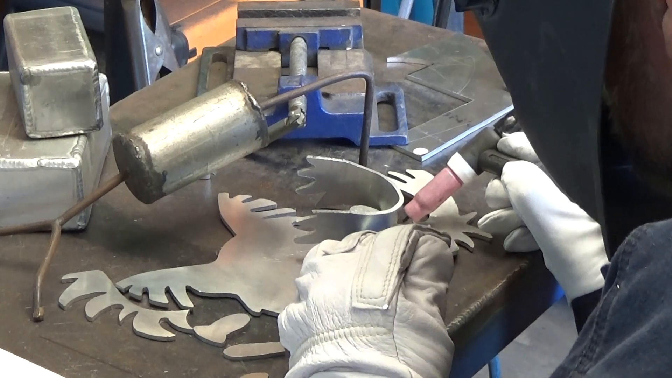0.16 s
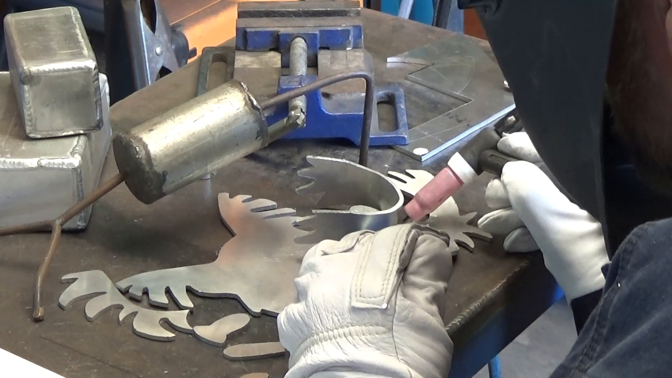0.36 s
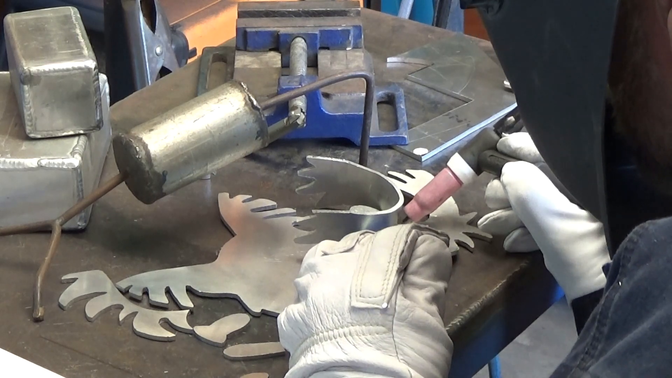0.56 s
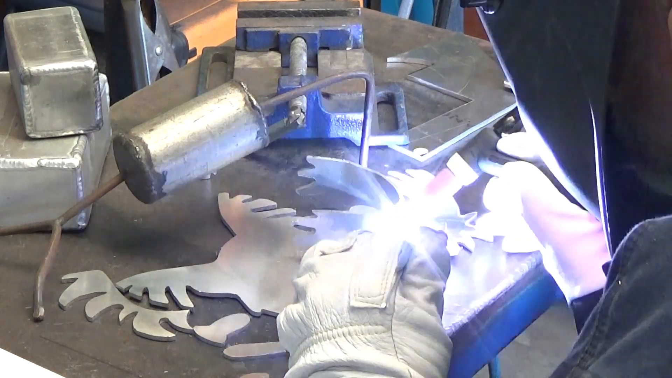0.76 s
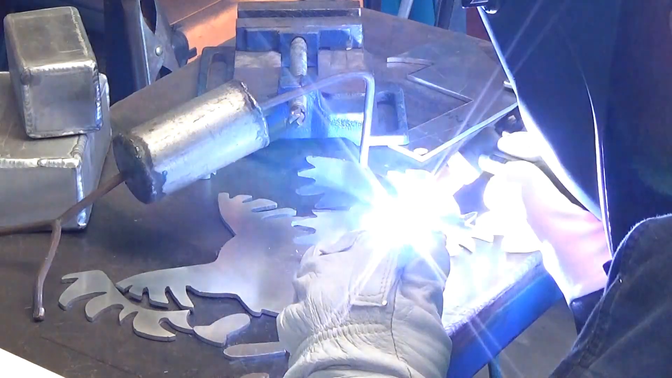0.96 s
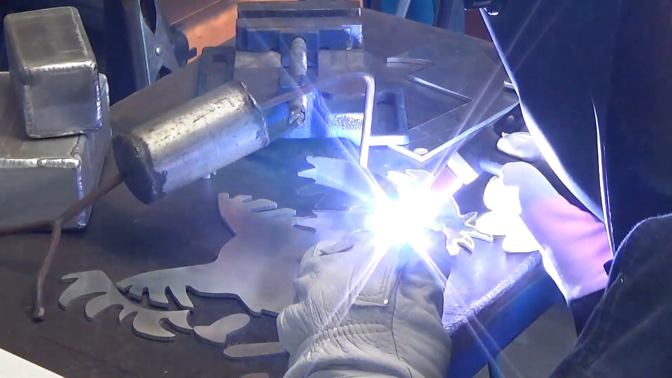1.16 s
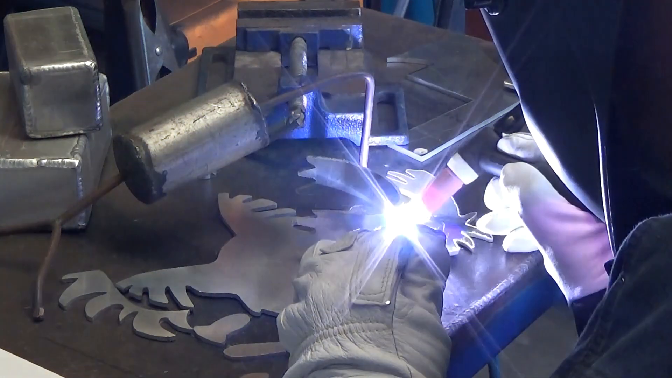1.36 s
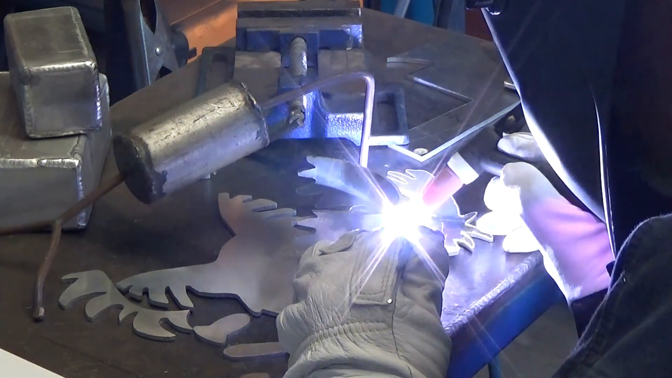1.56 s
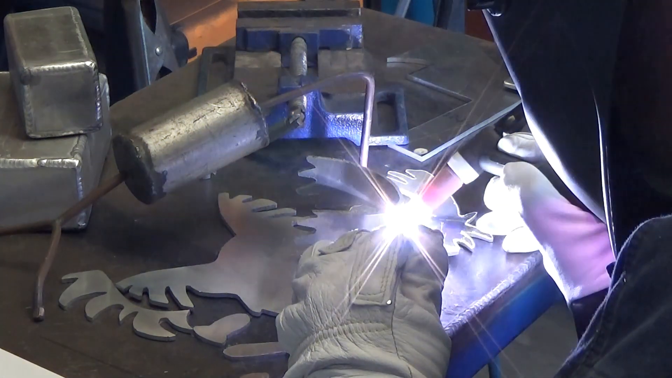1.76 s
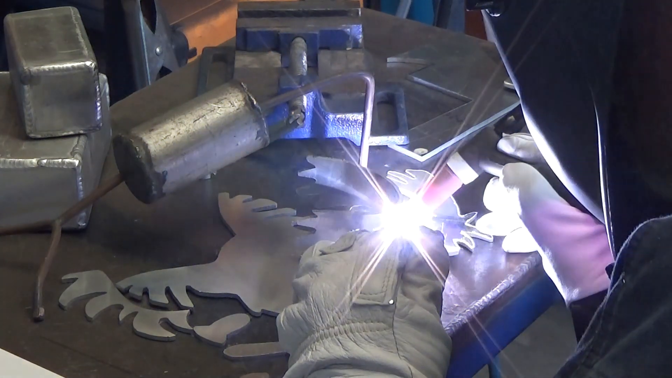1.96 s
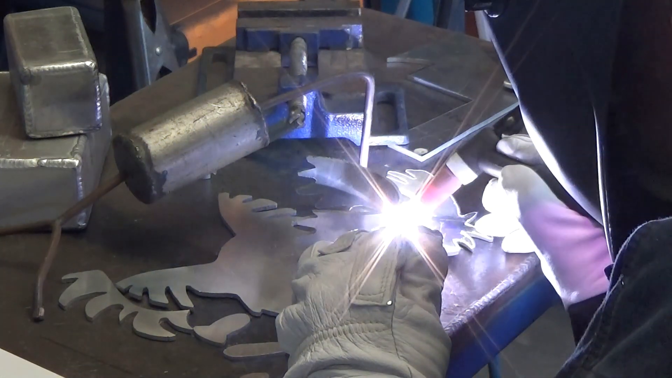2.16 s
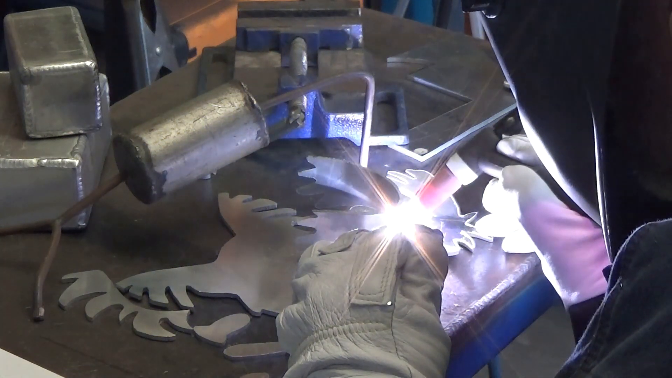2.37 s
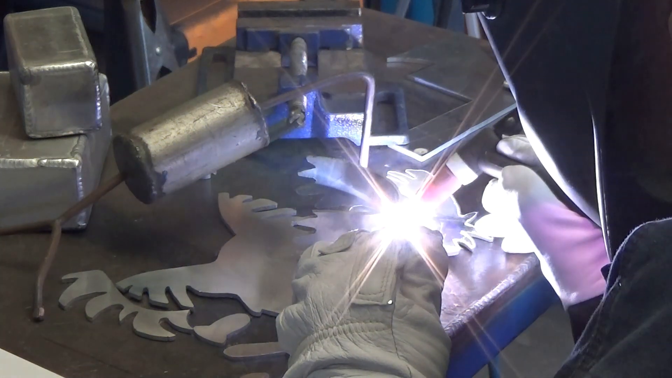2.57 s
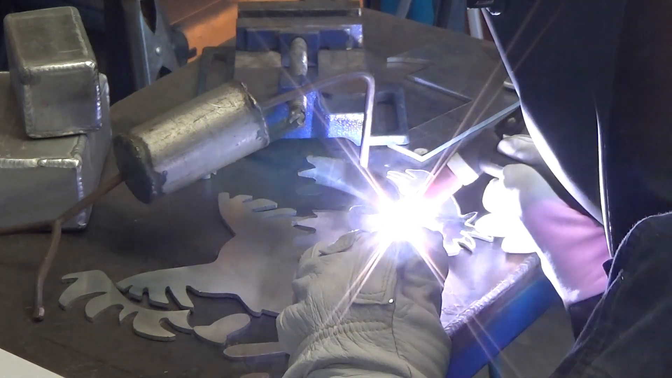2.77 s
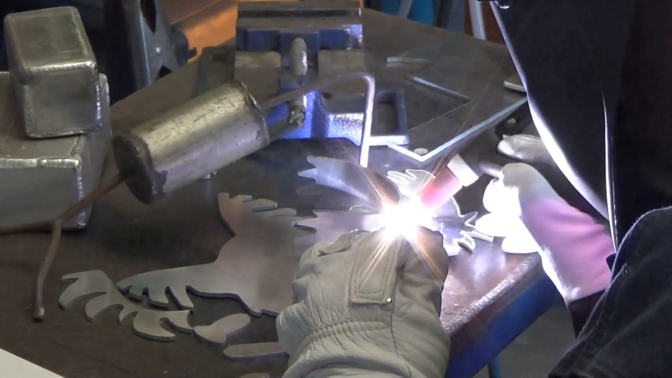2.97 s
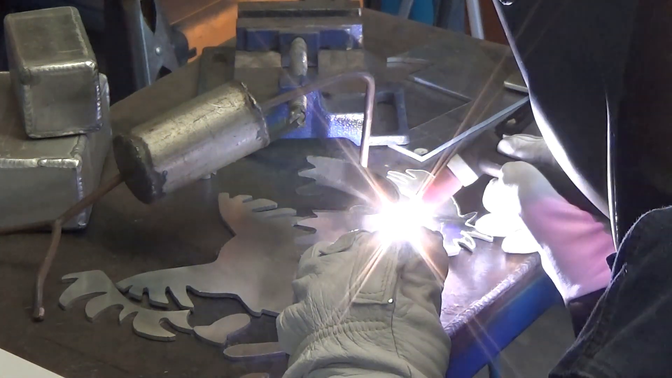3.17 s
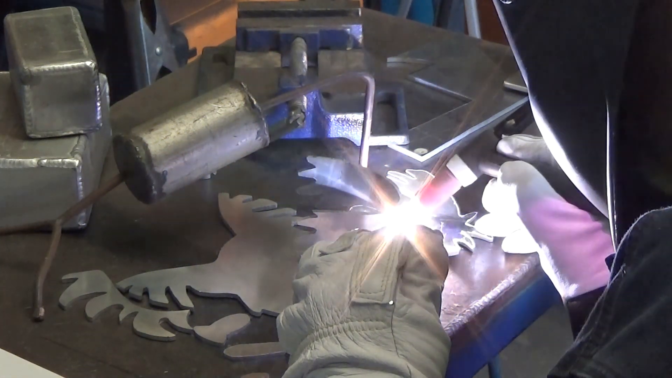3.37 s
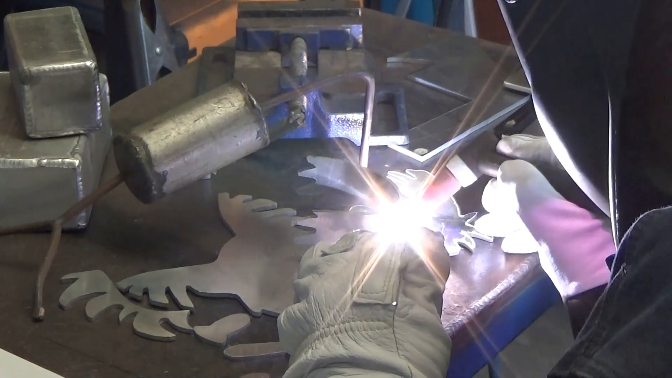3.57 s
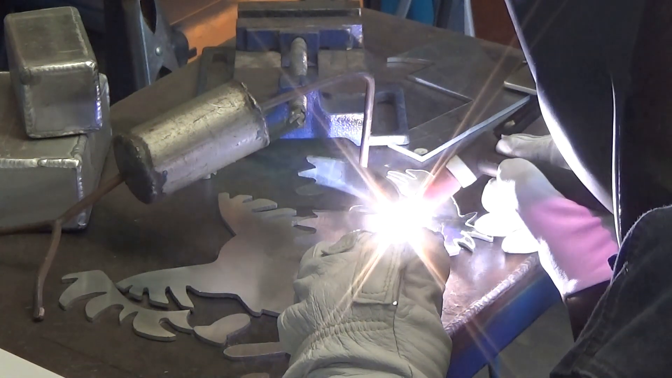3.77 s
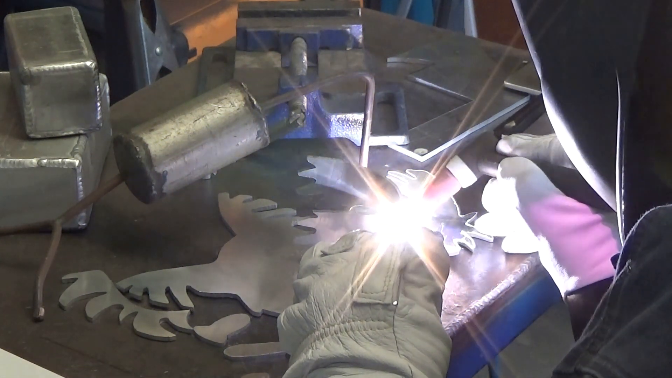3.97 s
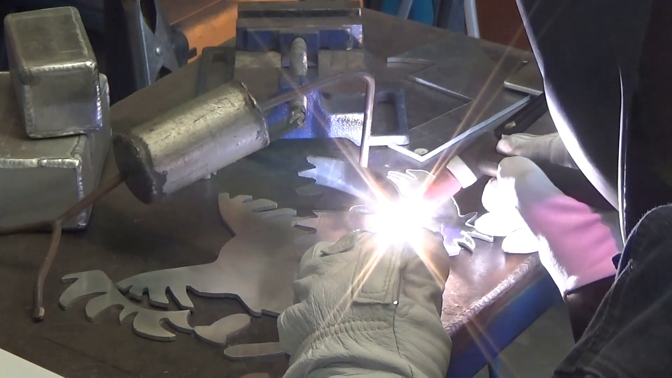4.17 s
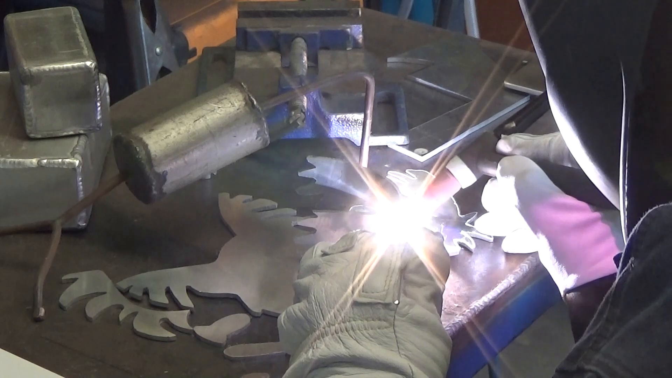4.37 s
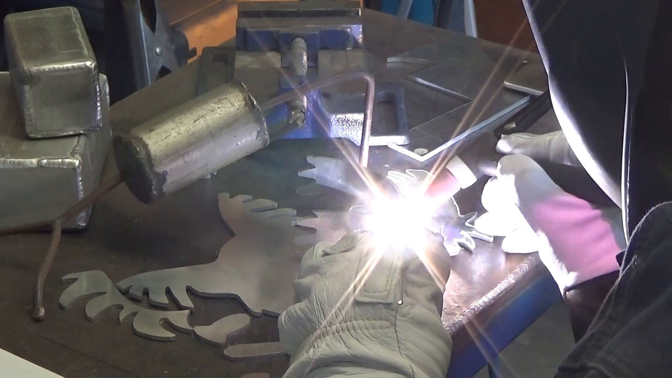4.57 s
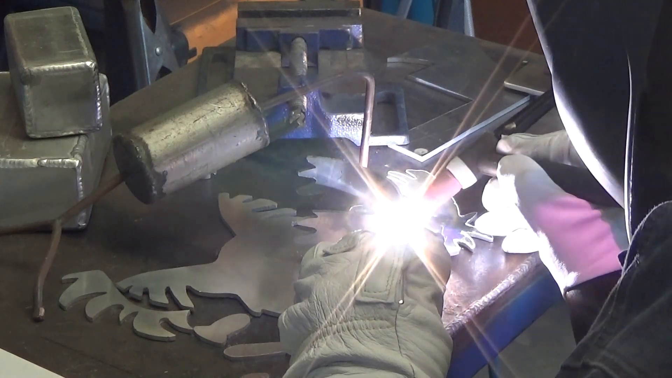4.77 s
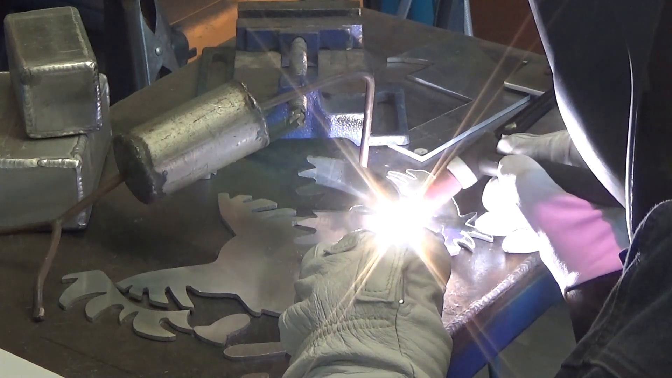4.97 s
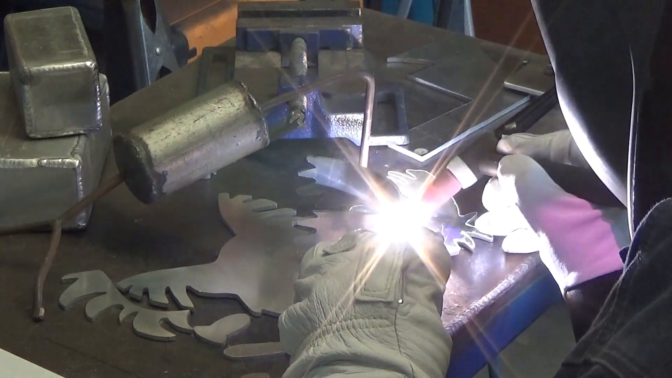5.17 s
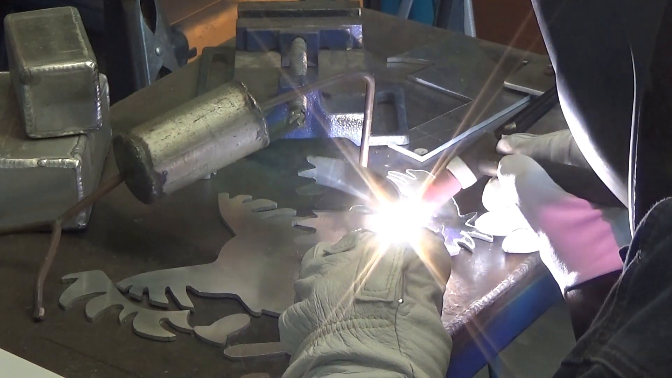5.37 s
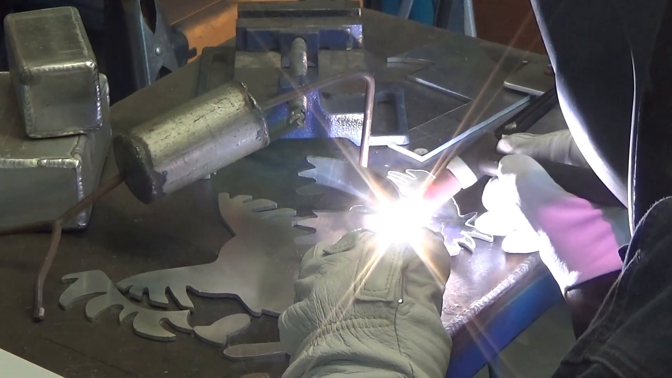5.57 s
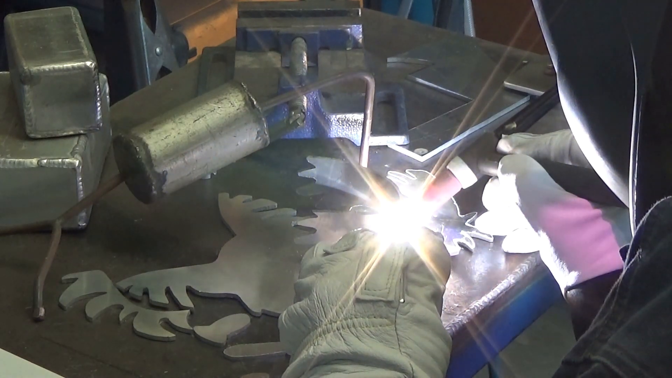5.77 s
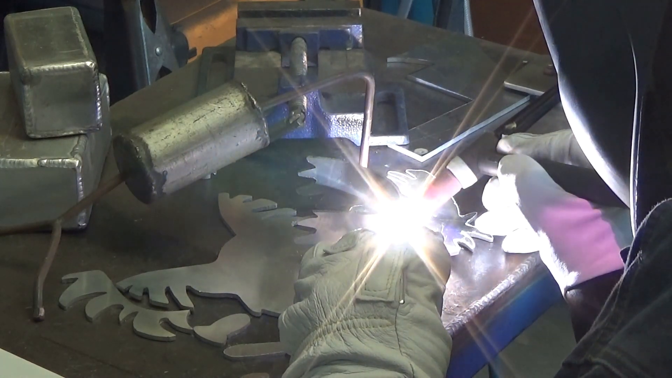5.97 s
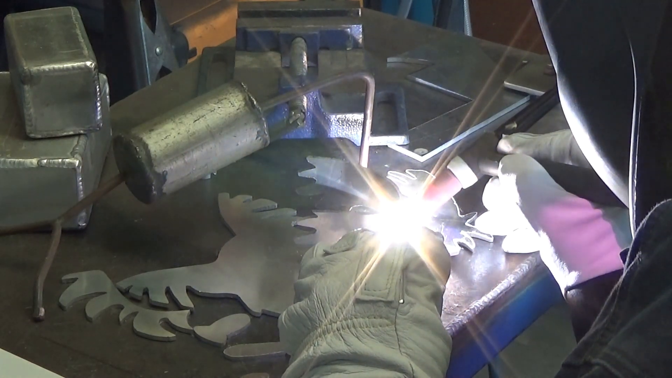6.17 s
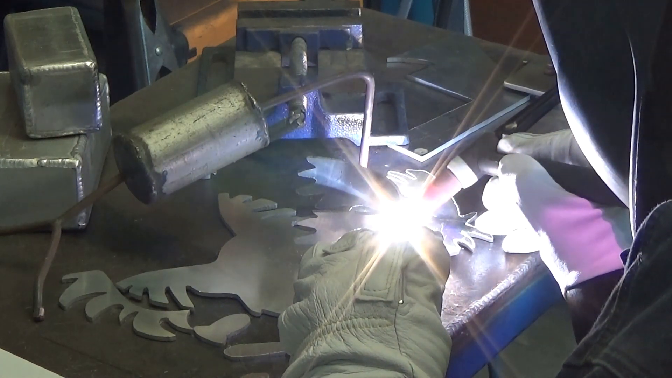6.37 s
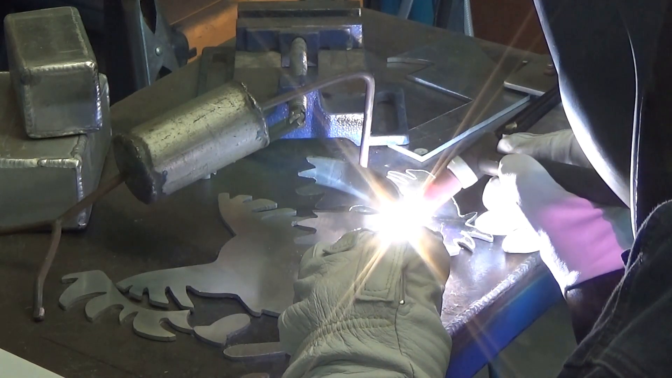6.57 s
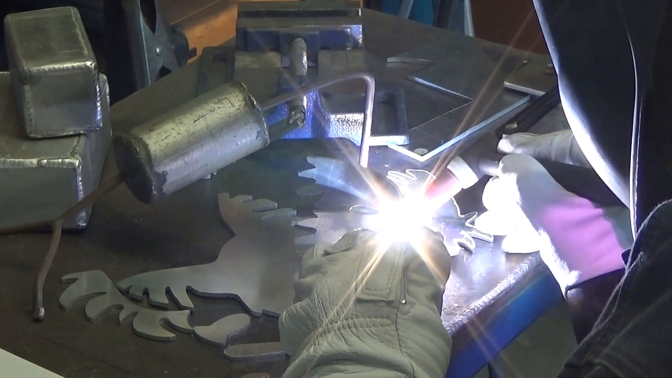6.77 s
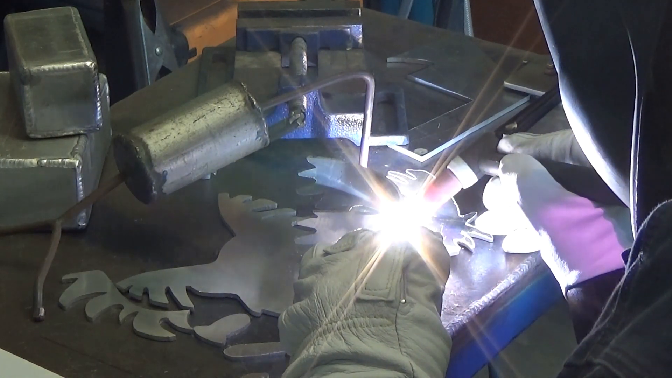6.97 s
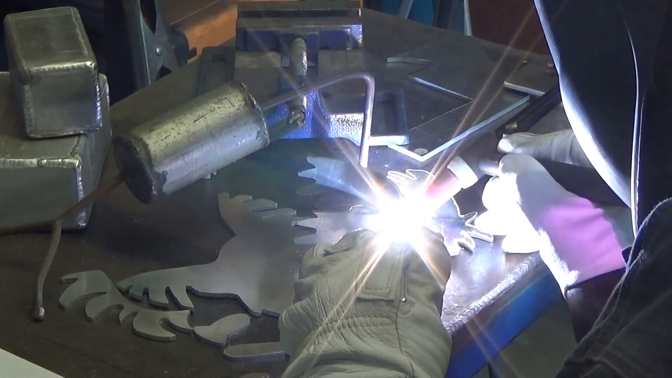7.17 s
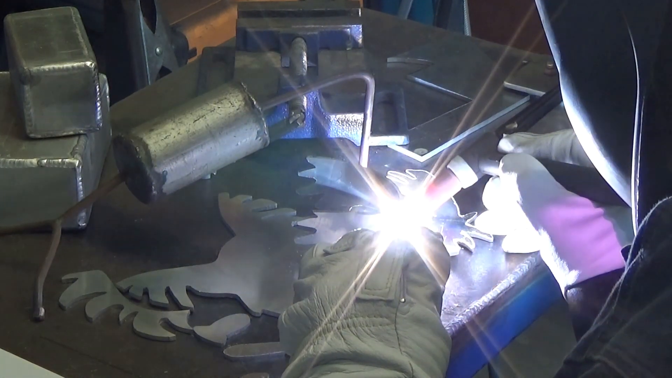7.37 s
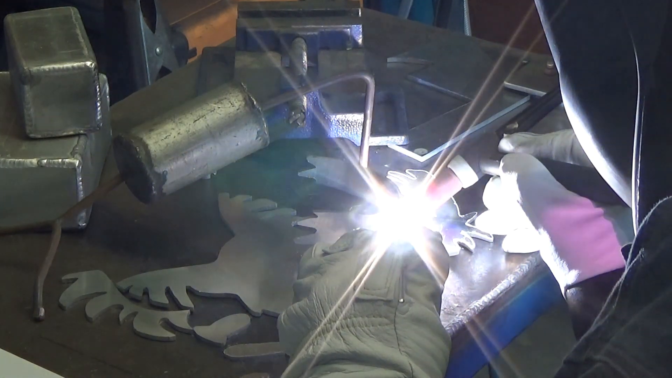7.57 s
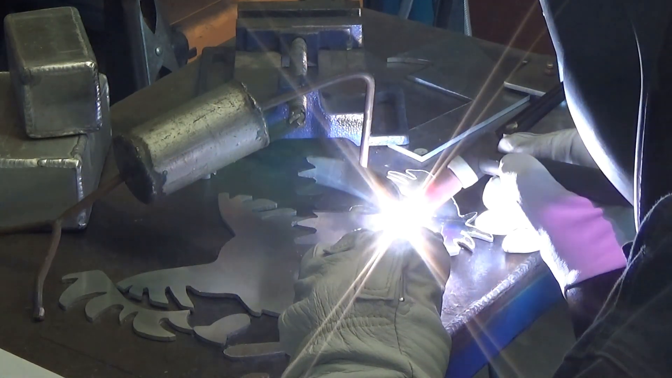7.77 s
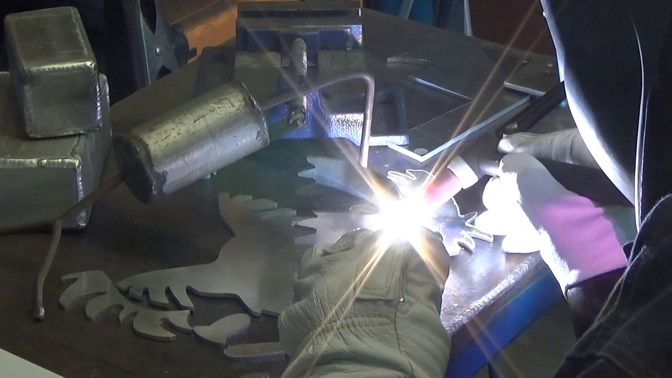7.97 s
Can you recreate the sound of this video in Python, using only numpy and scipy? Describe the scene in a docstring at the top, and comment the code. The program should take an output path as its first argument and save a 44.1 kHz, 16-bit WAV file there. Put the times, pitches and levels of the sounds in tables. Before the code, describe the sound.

Low room noise and a soft machine hum come first, then a crisp zap, spitting sparks and irregular pops as a torch strikes on metal. A brief uneven roar turns abruptly into a regular, buzzing alternating-current arc, bright and grating, with a ringing metallic edge and sizzling hiss. Slight flutters roughen it early on, then it holds steady to the end. Heard close at a steel bench, in narrow stereo with hard reflections.

```python
"""A workshop hums; a spark burst and pops light a rough, roaring welding arc, which then snaps, buzzes and hisses.
Place: a steel bench; distance: an arm's length; microphones: two, with left and right a little apart.
Sparks, roar and hiss are coloured noise; snaps and pops are shaped clicks, two snaps in every current cycle.
The buzz is a sum of sines at multiples of the cycle; short rings follow the second snaps.
Delayed copies and decaying noise tails give the echoes of the bench and the room."""
import sys
import numpy as np
from scipy import signal
from scipy.fft import rfft, irfft, next_fast_len
from scipy.io import wavfile
from scipy.ndimage import uniform_filter1d

SR = 44100
rng = np.random.default_rng(int(sys.argv[2]) if len(sys.argv) > 2 else 0)


def to_wav(s):
    """Save 16-bit WAV."""
    ch = np.atleast_2d(s).T  # columns
    pcm = np.round(np.clip(ch, -1, 1) * 32767)  # PCM
    wavfile.write(sys.argv[1], SR, pcm.astype(np.int16))


N = 353682
T = np.arange(N) / SR  # time of each sample, s

# Colour of the shop's background noise: (frequency [Hz], relative density [dB per Hz])
SHOP_COLOUR = [(15, -60), (25, -18.5), (140, -19.5), (194, -5.5), (315, -5), (401, -14.5), (435, -7),
               (554, -7), (617, -7.5), (924, -3.5), (1120, -12), (1280, -7.5), (1380, -11), (3000, -14),
               (5500, -19.5), (7400, -26.5), (9500, -23), (11500, -34), (13000, -42), (15600, -60)]
# Lines of an idling machine, before wander and sink: (frequency [Hz], peak level [dB])
MACHINE_LINES = [(199.2, -75.5), (317.6, -74), (398.4, -80), (629.8, -72), (769.8, -76), (1260, -73.5)]
# The background sinks and partly comes back: (time [s], gain [dB])
BACKGROUND_SINK = [(0, 2), (1.6, -1), (2.2, -4.5), (5.4, -7), (7, -3.5), (8.02, -1.5)]
# Background at the two microphones: (frequency [Hz], left-right likeness [0-1])
LEFT_RIGHT_LIKENESS = [(60, .999), (180, .999), (350, .99), (550, .93), (1650, .84), (4970, .8),
                       (15000, .94)]
SHOP_DB = -65  # background noise before the sink

# Lighting up: (time [s], roar level [dB], spark level [dB], gas hiss level [dB])
STRIKE_LEVELS = [(0.717, -73, -58, -70), (0.727, -57, -43, -56), (0.76, -55, -46.5, -58),
                 (0.79, -51, -47.5, -60), (0.83, -47, -51, -56), (.87, -45, -49, -57),
                 (.9, -43.5, -52.5, -54), (.95, -44.5, -57, -51), (1.013, -43.5, -49, -57),
                 (1.02, -40, -43, -56)]
# Colours of roar, spark fizz and gas in the nozzle: (frequency [Hz], relative density [dB per Hz])
ROAR_COLOUR = [(59, -77), (100, -32), (174, -6.5), (271, -15), (358, -3.5), (520, -4.5), (700, -7.5),
               (1050, -3), (1300, -0.5), (1550, -2), (1810, -5.5), (3600, -6.5), (5000, -11), (6500, -47),
               (11000, -120)]
SPARK_COLOUR = [(2060, -17), (3500, -10), (4790, -2), (4940, -5), (6350, -2), (7060, -9), (7660, -6),
                (9130, -3), (9900, -3), (11800, -11), (14600, -17), (15600, -20)]
GAS_COLOUR = [(8900, -43), (9400, -8), (9650, 0), (9900, -10), (10400, -40)]
# Resonances of the spark bursts: (frequency [Hz], width parameter [Hz], relative gain [dB])
TORCH_RINGS = [(4990, 450, -1.5), (6160, 400, -1.5), (8370, 300, -8), (9430, 450, .5), (11200, 900, -9)]
# Spark bursts: (time [s], level before onset smoothing [dB], t60 [s])
SPARK_BURSTS = [(.7175, -31.5, .025), (.7218, -34, .025), (.7595, -38, .04)]
# Pops while the arc settles: (time [s], size before the dull-bright split [dB], dullness [0-1])
POP_EVENTS = [(.7443, -24, 0.1), (.748, -23, 0.1), (.7511, -24, 0.1), (.754, -25, .1), (.8032, -27, .2),
              (.8374, -28, .3), (.86, -30, .3), (.8775, -29, .3), (.8796, -32, .3), (.9027, -32, .3),
              (.9048, -31, .3), (.9325, -24, .2), (.9611, -33, .4), (1.0019, -29, .7), (1.0107, -26, .8)]
CRACKLES_PER_S, CRACKLE_DB = 220, -44  # mean rate; size of the smallest clicks

# Alternating current: cycle rate, start, and second reversal after the first
CYCLE_HZ, SWITCH_S, SECOND_MS = 47.668, 1.015, 7.075
# Drift of the first reversal within the cycle: (time [s], delay [ms])
REVERSAL_DRIFT = [(1.03, 3.825), (2.25, 3.838), (4.4, 3.963), (4.85, 3.967), (5.85, 3.916), (6.55, 3.894),
                  (7.1, 3.895), (7.5, 3.863), (8.02, 3.861)]
# Wavers of the arc: (time [s], Gaussian spread [s], added scatter [ms], roar level [dB])
ARC_WAVERS = [(1.07, 0.042, 0.0065, -59), (1.183, 0.013, 0.013, -48), (1.644, 0.05, 0.0099, -56),
              (1.76, 0.037, 0.025, -53.5), (1.87, 0.022, 0.0073, -57), (2.226, 0.013, 0.026, -56),
              (4.48, 0.037, 0.004, -61.5), (4.63, 0.022, 0.0062, -58.5), (5.098, 0.037, 0.0041, -63),
              (5.247, 0.025, 0.004, -64), (6.614, 0.037, 0.0029, -63), (6.924, 0.021, 0.007, -61),
              (7.874, 0.026, 0.003, -65)]
# Roar of the wavering arc: (frequency [Hz], relative density [dB per Hz])
WAVER_COLOUR = [(250, -40), (400, -6), (800, -12), (1150, -4), (1500, -1), (1850, -1), (2300, -6),
                (3600, -8), (5000, -26), (8000, -60)]
# Brief dips: (time [s], Gaussian spread [s], depth [dB])
LEVEL_DIPS = [(1.17, 0.01, -1), (3.07, 0.021, -1), (4.74, 0.058, -2), (5.82, 0.45, -0.5),
              (6.7, 0.019, -1.5), (7.497, 0.08, -2)]
DIP_SNAP, DIP_BODY, DIP_HISS, DIP_HUM = 0.97, 0.69, 2.7, 2  # multiples of the dip taken by each layer
SCATTER_START_MS, SCATTER_END_MS = 0.0028, 0.0049  # timing chance, loosening from start to end
CREEP_START_MS, CREEP_END_MS = 0.0089, 0.01  # slower timing wander as the arc length creeps

# Colour of one snap: (frequency [Hz], relative gain [dB])
SNAP_COLOUR = [(2200, -14), (3000, -6), (4000, -6.5), (5000, -1.5), (6000, -6), (7000, -3.5), (8000, 0.5),
               (9500, -4.5), (11000, 0.1), (12500, -2.5), (13500, -10.5), (14500, -22.5), (15500, -27)]
SNAP_DB, BODY_DB = -24, -2  # snap peak before shading; gain on its body, mostly below 5 kHz
SNAP_SPREAD_DB, FIRST_SNAP_DB = 0.6, -0.4  # chance in strength; the first snap against the second
BODY_SPREAD_DB, EDGE_SPREAD_DB = 0.6, 1.0  # wandering colour of body and treble edge
EDGE_START_DB, EDGE_END_DB, EDGE_RISE_S = -3.5, -0.1, 1  # the treble edge comes up as the arc settles
# Shifting bands: (centre [Hz], half width to -30 dB [Hz], first gain [dB], last gain [dB],
# shift time [s], abruptness [exponent])
SNAP_SHIFTS = [(10100, 630, 9, -3, 2.2, 0.88), (3690, 1400, 7, -5.5, 5.2, 1),
               (2900, 600, -6.5, 8.5, 7.3, 2), (12600, 800, -5, 5.5, 2.8, 2.5),
               (10700, 300, 4, 3, 3.1, 2.5), (7900, 300, -9, -8, 2.5, 2.3)]
# Hollows in snaps and their echoes: (centre [Hz], Gaussian spread [Hz], depth [dB])
SNAP_HOLLOWS = [(2230, 120, -3), (3100, 83, -2), (5400, 170, -6), (7700, 170, -3)]
# Softer ringing burst after the second snap: (base frequency [Hz], t60 [s], level over the snap's [dB])
CHIRP_RINGS = [(9178, 0.012, -10.5), (8890, 0.0095, -9), (6440, 0.0094, -15), (10550, 0.0067, -16)]
CHIRP_MS = 12.3  # after the first reversal
CHIRP_SHARP, CHIRP_EARLY_DB, CHIRP_SETTLE_S = 0.058, -4, 0.65  # early pitch share, early gain, settling time

# Low multiples of the buzz, before dips, wander and settling:
# (multiple of the cycle, level when strong [dB], when middling [dB], when weak [dB])
BUZZ_MULTIPLES = [(3, -87.0, -91.5, -95.5), (5, -72.5, -88.5, -78.5), (7, -73.0, -85.5, -86.5),
                  (8, -69.0, -86.5, -91.0), (10, -66.5, -76.0, -86.0), (11, -66.0, -81.5, -81.0),
                  (12, -68.5, -77.0, -80.5), (14, -72.0, -91.5, -85.0), (15, -68.0, -78.5, -84.0),
                  (17, -73.5, -90.5, -78.5), (20, -76.0, -76.0, -73.0), (21, -73.5, -77.5, -76.0),
                  (22, -71.0, -79.5, -84.5), (23, -65.0, -69.0, -72.5), (24, -64.0, -70.5, -75.0),
                  (25, -65.5, -77.5, -85.0), (26, -70.0, -77.5, -77.5), (27, -60.0, -66.5, -72.5),
                  (28, -64.0, -73.5, -75.5), (29, -64.0, -68.0, -74.0), (30, -61.5, -65.5, -72.0),
                  (31, -71.5, -82.5, -84.5), (32, -53.5, -60.0, -65.0), (33, -68.0, -69.0, -74.0),
                  (34, -73.0, -78.0, -83.5), (35, -55.5, -62.0, -67.0), (36, -57.5, -64.0, -70.5),
                  (37, -71.0, -77.0, -78.5), (38, -63.0, -72.0, -76.5), (39, -56.0, -62.5, -68.5),
                  (40, -73.5, -85.5, -85.5), (41, -66.0, -72.0, -73.0), (44, -64.0, -68.5, -68.0),
                  (45, -70.0, -73.5, -73.5)]
# Control that sets the strength of the buzz: (time [s], level [dB])
BUZZ_STRENGTH = [(1.02, -45.5), (1.41, -45), (1.78, -45), (1.97, -49.5), (3.3, -52), (3.94, -54.5),
                 (5.22, -55.5), (5.33, -58), (6.65, -59), (8.02, -60)]
STRONG_DB, WEAK_DB = -44, -58.5  # control levels for strength 1 and 0
WEAKEST, MIDDLING = -0.08, 0.4  # strengths at which the weak and middling columns hold
BUZZ_SWEEP = 18.5  # upward sweep within the cycle, this many multiples in one turn
# The uneven fade of the hum, before dips and wander: (time [s], level [dB])
HUM_FADE = [(1.02, -55), (1.5, -53.5), (1.82, -56.5), (1.97, -62.5), (2.6, -64), (3.3, -65), (3.8, -69),
            (4.5, -68.5), (5.2, -72), (5.5, -80), (6.3, -86), (7.1, -78.5), (8.02, -72)]
HUM_MULTIPLE = 9  # of the cycle
# High multiples sung by the resonant workpiece, before wander:
# (multiple of the cycle, level at first [dB], midway [dB], at last [dB])
SINGING_MULTIPLES = [(74, -57.0, -63.0, -68.5), (95, -65.0, -64.0, -64.5), (98, -66.0, -65.0, -63.5),
                     (104, -63.5, -63.5, -62.5), (118, -63.0, -66.5, -66.5), (122, -67.0, -62.0, -61.0),
                     (125, -70.5, -64.0, -63.0), (127, -63.0, -59.5, -59.0), (130, -63.5, -65.0, -63.5),
                     (131, -59.0, -67.0, -66.0), (133, -66.0, -60.0, -58.5), (134, -59.0, -70.5, -68.5),
                     (136, -56.5, -57.5, -57.5), (139, -62.0, -61.5, -64.5), (140, -66.0, -61.5, -62.0),
                     (142, -65.5, -62.0, -62.0), (145, -61.5, -60.5, -65.0), (148, -56.0, -57.5, -60.0),
                     (166, -62.0, -65.0, -62.0), (172, -61.0, -62.0, -65.5), (187, -59.5, -57.0, -62.0),
                     (190, -60.0, -62.0, -60.5), (192, -65.5, -57.5, -60.0), (195, -61.0, -57.0, -57.0),
                     (196, -68.5, -69.0, -58.0), (198, -60.0, -61.0, -59.0), (199, -59.5, -57.0, -58.0),
                     (202, -60.0, -64.5, -61.0), (207, -56.0, -64.5, -69.0), (222, -61.5, -62.5, -64.5),
                     (225, -59.5, -61.5, -58.0), (229, -63.5, -62.5, -64.5), (243, -65.0, -60.5, -60.0),
                     (246, -67.0, -62.0, -64.5), (255, -82.5, -62.0, -62.5), (261, -71.5, -62.5, -62.5)]
SINGING_WANDER_DB = 1.6
LOOSE_RAD = 1  # scale of the chance in a sung multiple's phase against the snaps
HELD_HZ = 9  # Gaussian spread of the notches cleared for the sung multiples
# Just after the switch the buzz peaks low; the peak glides up while higher multiples come in
SETTLE_S, SETTLE_FROM_HZ, SETTLE_TO_HZ, SETTLE_WIDTH_HZ = 0.15, 1160, 1540, 250
SETTLE_PEAK_DB, SETTLE_ABOVE_DB = 6, -5

# Colour of the arc hiss: (frequency [Hz], relative density [dB per Hz])
HISS_COLOUR = [(300, -3.5), (700, -11), (1500, -4), (2200, -0.5), (2700, 2), (3500, -2.5), (4900, 0.5),
               (5400, 4), (5900, 2), (6500, -6), (8000, 2), (9500, 3), (11000, -10), (13000, -12),
               (14500, -24), (15600, -37)]
HISS_START_DB, HISS_DB_PER_S, HISS_WANDER_DB = -60.5, 1.08, 1.5
# Diffuse hiss, opposite at left and right: (frequency [Hz], relative density [dB per Hz])
AIR_COLOUR = [(500, -47), (1000, -9), (2500, -4), (4000, 11.5), (6000, 13), (8500, 0), (10000, -4),
              (11000, -3), (13000, -18), (15000, -26)]
AIR_DB = -62.5  # before the dips

# Echoes of nozzle, bench and vice: (delay [ms], signed share at first, signed share at last)
NEAR_ECHOES = [(.06, .3, .1), (.24, -.3, -.17), (.3, .22, .25), (.372, -.24, -.4), (.55, -.25, -.08),
               (.638, .28, .18), (1.07, -.15, -.05), (1.16, -.08, -.08), (1.999, .12, .12),
               (5.542, -.11, -.11), (5.942, .22, .22), (8.16, -.2, -.2)]
ECHO_SHIFT_S = 1.8  # the echoes change as the torch travels along the seam
# Decay of the room: (frequency [Hz], t60 [s])
ROOM_DECAY = [(300, 0.55), (2000, 0.71), (6000, 0.21), (14000, 0.37)]
# Colour of the room's answer to the snaps: (frequency [Hz], gain [dB])
ROOM_COLOUR = [(2200, 4.5), (2800, 2.5), (3200, -3), (3550, 0.5), (4100, -2.5), (4700, -8.5), (5400, 0.5),
               (5900, -11.5), (6500, 1), (7100, -4), (7600, -1.5), (8050, 1), (8500, -1.5), (9300, -6.5),
               (10200, -4), (11000, -5.5), (13000, -10), (14000, -3), (15000, -9)]
# Colour of the arc's stereo side: (frequency [Hz], relative gain [dB])
SIDE_COLOUR = [(95, -36), (240, -51), (380, -41), (600, -11), (950, -0.5), (1500, -10.5), (2380, -3),
               (3770, -6), (5980, -3.5), (8000, 1), (9470, -3), (11000, -16.5), (13000, -31), (15000, -32)]
EDGE_HZ = 15800  # band limit


def gain_of(db):
    """Decibels to amplitude."""
    return 10 ** (np.asarray(db) / 20)


def evened(x):
    """Scales to rms 1."""
    return x / np.sqrt(np.mean(x ** 2) + 1e-20)


def read(points, hz):
    """A spectrum table read on a log frequency axis."""
    f, value = np.transpose(points)
    return np.interp(np.log(hz + 1), np.log(f + 1), value)


def curves(rows):
    """Each column of a timed table, sample by sample."""
    s, *columns = np.transpose(rows)
    return [np.interp(T, s, column) for column in columns]


def spectrum_axis():
    """Padded FFT size and its frequencies in Hz."""
    size = next_fast_len(N, True)
    return size, np.fft.rfftfreq(size, 1 / SR)


def coloured(x, points):
    """Filters by a spectrum table."""
    size, hz = spectrum_axis()
    return irfft(rfft(x, size) * gain_of(read(points, hz)), size)[:N]


def noise(points):
    """Noise of rms 1 with the given spectrum."""
    return evened(coloured(rng.standard_normal(N), points))


def slow(hz, t=None):
    """Smoothed random wander, about rms 1, mostly slower than hz."""
    steps = np.arange(0, N / SR + 1, .125 / hz)
    wander = evened(uniform_filter1d(rng.standard_normal(len(steps)), size=5))
    return np.interp(T if t is None else t, steps, wander)


def clicks(s, size):
    """Band-limited impulses at exact moments, between samples too."""
    at = np.asarray(s)[:, None] * SR
    k = np.round(at) + np.arange(-16, 17)
    inside = (k >= 0) & (k < N)
    pulses = np.sinc(k - at) * np.hanning(33) * size[:, None]
    return np.bincount(k[inside].astype(int), pulses[inside], N)


def shop():
    """Partly shared left-right noise and the wavering lines of an idling machine, slowly sinking and partly
    rising again."""
    size, hz = spectrum_axis()
    same = np.clip(read(LEFT_RIGHT_LIKENESS, hz), -1, 1)
    left, other = rfft(noise(SHOP_COLOUR), size), rfft(noise(SHOP_COLOUR), size)
    right = same * left + np.sqrt(1 - same ** 2) * other
    background = irfft([left, right], size)[:, :N] * gain_of(SHOP_DB)
    lines = sum(gain_of(db + 2.8 * slow(2.83)) * np.sin(2 * np.pi * (f * T + 0.14 * slow(4)))
                for f, db in MACHINE_LINES)
    return (background + lines) * gain_of(curves(BACKGROUND_SINK)[0])


def strike():
    """Lumpy roar, spark fizz and gas hiss, as coloured noise until the current alternates."""
    roar_db, spark_db, gas_db = curves(STRIKE_LEVELS)
    lit = (T > STRIKE_LEVELS[0][0]) & (T < SWITCH_S)
    lumps = evened(gain_of(1.7 * slow(200)))
    roar = gain_of(roar_db) * lumps * noise(ROAR_COLOUR)
    fizz = gain_of(spark_db) * noise(SPARK_COLOUR)
    gas = gain_of(gas_db) * noise(GAS_COLOUR)
    return lit * (roar + fizz + gas)


def spark_bursts():
    """Noise through the torch's resonances swells fast and dies exponentially."""
    size, hz = spectrum_axis()
    ring = sum(gain_of(db) / (1 + 1.3j * (hz - f) / width) ** 2 for f, width, db in TORCH_RINGS)
    ringing = evened(irfft(rfft(rng.standard_normal(size)) * ring, size)[:N])
    out = np.zeros(N)
    for s, db, t60 in SPARK_BURSTS:
        since = np.maximum(T - s, 0)
        out += gain_of(db - 60 * since / t60) * (1 - np.exp(-since / 0.00035)) * ringing
    return out


def pops():
    """Bright shares as bare clicks for the snap's path; dull shares as short damped 1900 Hz thumps."""
    s, db, dull = np.transpose(POP_EVENTS)
    dull = np.clip(dull, 0, 1)
    t = np.arange(100) / SR
    thump = np.sin(2 * np.pi * 1900 * t) * np.exp(-t / .0004) * 1.4
    bright_clicks = clicks(s, gain_of(db) * (1 - dull))
    dull_clicks = clicks(s, gain_of(db) * dull)
    return bright_clicks, np.convolve(dull_clicks, thump)[:N]


def crackle():
    """Sparse random clicks from the fifth pop until the switch, a few of them large."""
    chance, size, sign = rng.random((N, 3)).T
    lit = (T > POP_EVENTS[4][0]) & (T < SWITCH_S) & (chance < CRACKLES_PER_S / SR)
    size_db = CRACKLE_DB - 4.5 * np.log(np.maximum(size, .03))
    return lit * np.sign(sign - .5) * gain_of(size_db)


def dipping():
    """The brief level dips as one curve in dB."""
    return sum(db * np.exp(-.5 * ((T - s) / length) ** 2) for s, length, db in LEVEL_DIPS)


def wavering():
    """The wavering arc loosens its timing and roars: scatter in ms and roar amplitude."""
    bumps = [np.exp(-.5 * ((T - s) / length) ** 2) for s, length, _, _ in ARC_WAVERS]
    scatter = SCATTER_START_MS + (SCATTER_END_MS - SCATTER_START_MS) * T * SR / N
    scatter = scatter + sum(bump * abs(row[2]) for bump, row in zip(bumps, ARC_WAVERS))
    return scatter, sum(bump * gain_of(row[3]) for bump, row in zip(bumps, ARC_WAVERS))


def snap_shape():
    """The causal, minimum-phase pulse with the snap's colour, peak 1."""
    points = [(0, -20.0), (1600, -52.0)] + list(SNAP_COLOUR)
    log_gain = np.log(gain_of(read(points, abs(np.fft.fftfreq(1024, 1 / SR)))))
    shape = np.fft.ifft(np.exp(np.conj(signal.hilbert(log_gain)))).real[:200]
    return shape / abs(shape).max()


def snaps(level_db, scatter):
    """The arc dies and relights at both reversals; each relight is a snap, a little early or late."""
    start = np.arange(int(N / SR * CYCLE_HZ) + 1) / CYCLE_HZ
    start = start + np.interp(start, *np.transpose(REVERSAL_DRIFT)) / 1000
    s = np.concatenate([start, start + SECOND_MS / 1000])
    late, strength = rng.standard_normal((len(s), 2)).T
    wander_ms = (CREEP_START_MS + (CREEP_END_MS - CREEP_START_MS) * T * SR / N) * slow(5.2)
    s = s + (late * np.interp(s, T, scatter) + np.interp(s, T, wander_ms)) / 1000
    size_db = np.repeat([FIRST_SNAP_DB, 0], len(start)) + SNAP_SPREAD_DB * strength
    return clicks(s, gain_of(size_db) * (s > SWITCH_S)) * gain_of(level_db)


def shaded(x, body_db, edge_db, since):
    """The body, some bands and the treble edge of the snaps change as the arc creeps along."""
    out = x + (gain_of(body_db) - 1) * coloured(x, [(4500, 0), (6000, -40)])
    out += (gain_of(edge_db) - 1) * coloured(x, [(10000, -40), (11500, 0)])
    for hz, width, first_db, last_db, shift_s, abrupt in SNAP_SHIFTS:
        band = coloured(x, [(hz - width, -30), (hz, 0), (hz + width, -30)])
        shift_db = last_db + (first_db - last_db) * np.exp(-(since / shift_s) ** abrupt)
        out += (gain_of(shift_db) - 1) * band * (since > 0)
    return out


def near_echoes(direct, since):
    """Nozzle, bench and vice return delayed copies, blending from first to last shares."""
    delay_ms, *shares = np.transpose(NEAR_ECHOES)
    early = np.exp(-(since / ECHO_SHIFT_S) ** 2)
    return sum(signal.oaconvolve(direct * part, clicks(delay_ms / 1000, share)[:1100])[:N]
               for part, share in zip([early, 1 - early], shares))


def room(x, change_s, count=3):
    """Dense tails fed in turn, as the welder's hands move and the echoes slowly change."""
    out = np.zeros(N)
    for k in range(count):
        hz, t, z = signal.stft(rng.standard_normal(SR // 2), SR, nperseg=256)
        decay = gain_of(-60 * t / read(ROOM_DECAY, hz)[:, None])
        tail = signal.istft(z * decay, SR, nperseg=256)[1]
        tail[:60] = 0  # samples of distance before the room answers
        feed = np.sqrt(2 / count) * np.cos(np.pi * (T / change_s + k / count))
        out += signal.fftconvolve(x * feed, tail / np.linalg.norm(tail))[:N]
    return out


def hollowed(x):
    """Cuts the hollows, and clears the multiples that the workpiece sings by itself."""
    size, hz = spectrum_axis()
    gain = gain_of(sum(db * np.exp(-.5 * ((hz - f) / width) ** 2) for f, width, db in SNAP_HOLLOWS))
    held = np.array([k * CYCLE_HZ for k, *_ in SINGING_MULTIPLES])
    nearest = np.searchsorted((held[1:] + held[:-1]) / 2, hz)
    gain = gain * (1 - np.exp(-.5 * ((hz - held[nearest]) / HELD_HZ) ** 2))
    return irfft(rfft(x, size) * gain, size)[:N]


def settling(hz, s):
    """The colour of the young buzz in dB at one frequency."""
    age = np.clip((s - SWITCH_S) / SETTLE_S, 0, 1)
    peak_hz = SETTLE_FROM_HZ + age * (SETTLE_TO_HZ - SETTLE_FROM_HZ)
    above = (hz - peak_hz) / SETTLE_WIDTH_HZ
    shape = SETTLE_PEAK_DB * np.exp(-.5 * above ** 2) + SETTLE_ABOVE_DB * np.clip(above - 1, 0, 1)
    return shape * (1 - age ** 4)


def snap_step(k):
    """The phase that the two snaps and their near echoes give to multiple k."""
    shape, turn = snap_shape(), -2j * np.pi * k * CYCLE_HZ
    pulse = shape @ np.exp(turn * (np.arange(len(shape)) - np.argmax(abs(shape))) / SR)
    echo = 1 + sum(share * np.exp(turn * ms / 1000) for ms, _, share in NEAR_ECHOES)
    return np.pi / 2 + np.angle(pulse * echo * (1 + np.exp(turn * SECOND_MS / 1000)))


def buzz(dip_db, scatter):
    """The swelling arc column sounds low multiples of the cycle; the workpiece sings high ones."""
    turns = CYCLE_HZ * (T - (curves(REVERSAL_DRIFT)[0] + 1.3 * scatter * slow(30)) / 1000)
    angle = (2 * np.pi * (turns % 1)).astype(np.float32)
    hum_db = curves(HUM_FADE)[0] + DIP_HUM * dip_db + 0.8 * slow(5)
    out = gain_of(hum_db) * np.sin(2 * np.pi * HUM_MULTIPLE * turns)

    # Levels move slowly: every 64th sample is enough
    coarse = T[::64]
    strong = (curves(BUZZ_STRENGTH)[0][::64] - WEAK_DB) / (STRONG_DB - WEAK_DB)
    voices = []
    for k, *db in BUZZ_MULTIPLES:
        level_db = np.interp(strong, [WEAKEST, MIDDLING, 1], db[::-1])
        level_db = level_db + dip_db[::64] + settling(k * CYCLE_HZ, coarse)
        voices.append((k, level_db, 1.2, -np.pi * k ** 2 / BUZZ_SWEEP))
    stages = np.linspace(SWITCH_S, N / SR, 3)
    for k, *db in SINGING_MULTIPLES:
        phase = snap_step(k) + LOOSE_RAD * rng.uniform(-0.86, 1)
        voices.append((k, np.interp(coarse, stages, db), SINGING_WANDER_DB, phase))
    for k, level_db, wander_db, phase in voices:
        level_db = level_db + wander_db * slow(2.5, coarse)
        out += np.interp(T, coarse, gain_of(level_db)) * np.sin(round(k) * angle + np.float32(phase))
    return np.sqrt(2) * out * np.clip((T - SWITCH_S) / 0.0077, 0, 1)


def hiss(level_db):
    """Arc noise, strongest in the few ms after the first reversal."""
    since_ms = (T - curves(REVERSAL_DRIFT)[0] / 1000) % (1 / CYCLE_HZ) * 1000
    gate = gain_of(2.1 * (since_ms < 4.6))
    return gain_of(level_db) * evened(gate * noise(HISS_COLOUR)) * (T > SWITCH_S)


def chirps(level_db, scatter):
    """Once a cycle a short ring swells and dies, locked to the current."""
    start = np.arange(int(SWITCH_S * CYCLE_HZ), int(N / SR * CYCLE_HZ) + 1) / CYCLE_HZ
    start = start + (np.interp(start, *np.transpose(REVERSAL_DRIFT)) + CHIRP_MS) / 1000
    late, strength = rng.standard_normal((len(start), 2)).T
    s = (start + late * np.interp(start, T, scatter) / 1000)[:, None]
    k = np.ceil(s * SR).astype(int) + np.arange(600)
    early = np.exp((SWITCH_S - s) / CHIRP_SETTLE_S)
    t, pitch = k / SR - s, 1 + CHIRP_SHARP * early
    ring = sum(gain_of(db - 60 * t / t60) * np.sin(2 * np.pi * hz * pitch * t)
               for hz, t60, db in CHIRP_RINGS)
    swell = 1 - np.exp(-t / 0.0006)
    ring = ring * swell * gain_of(1.3 * strength[:, None] + CHIRP_EARLY_DB * early)
    return np.bincount(k.ravel(), ring.ravel(), N)[:N] * gain_of(level_db)


def scene():
    """The arc, its echoes and the room, spread a little between the two microphones."""
    background = shop()
    dip_db, since = dipping(), np.maximum(T - SWITCH_S, 0)
    scatter, waver_roar = wavering()
    bright, dull = pops()

    # Snaps, bright pops and crackle share one pulse, its peak put on the click's moment
    snap_db = SNAP_DB + DIP_SNAP * dip_db
    shape = snap_shape()
    impulses = snaps(snap_db, scatter) - bright + crackle()
    direct = np.roll(np.convolve(impulses, shape)[:N], -np.argmax(abs(shape)))
    body_db = (BODY_DB + DIP_BODY * dip_db + BODY_SPREAD_DB * slow(60)) * (T > SWITCH_S)
    edge_db = EDGE_END_DB + (EDGE_START_DB - EDGE_END_DB) * np.exp(-since / EDGE_RISE_S)
    direct = shaded(direct, body_db, edge_db + EDGE_SPREAD_DB * slow(60), since)

    hiss_db = HISS_START_DB + HISS_DB_PER_S * since + HISS_WANDER_DB * slow(4.1) + DIP_HISS * dip_db
    noisy = strike() + spark_bursts() + dull + hiss(hiss_db) + waver_roar * noise(WAVER_COLOUR)
    noisy = coloured(noisy, [(80, -30), (220, 0)])  # a small source gives no deep bass

    snap_room = gain_of(2.0) * coloured(room(direct, 4.8), ROOM_COLOUR)
    mid = hollowed(direct + near_echoes(direct, since) + snap_room)
    mid += noisy + gain_of(-5.5) * room(noisy, 8.5)
    mid += buzz(dip_db, scatter) + chirps(snap_db, scatter)

    side = gain_of(-8.5) * coloured(room(mid, 4.5), SIDE_COLOUR)
    side += gain_of(AIR_DB + dip_db) * (T > STRIKE_LEVELS[1][0]) * noise(AIR_COLOUR)
    return mid + np.array([[1], [-1]]) * side + background


def record(dry):
    """The microphones' signal, band-limited by a linear-phase low-pass."""
    low_pass = signal.firwin(511, EDGE_HZ, window=("kaiser", 9), fs=SR)
    return signal.oaconvolve(dry, low_pass[None], "same")


dry = scene()
out = record(dry)
to_wav(out)
```